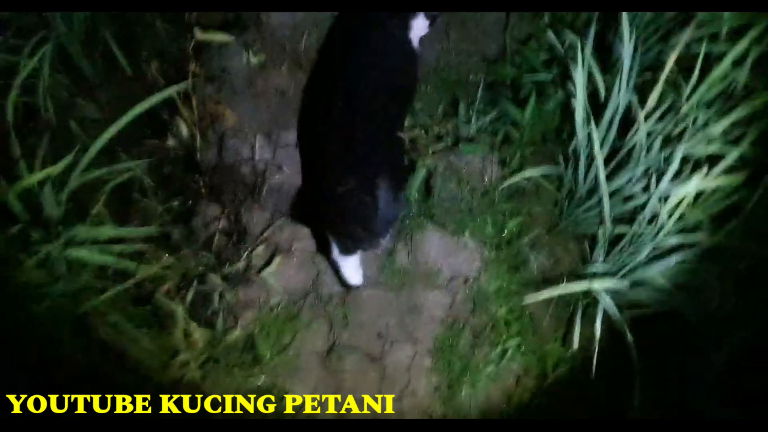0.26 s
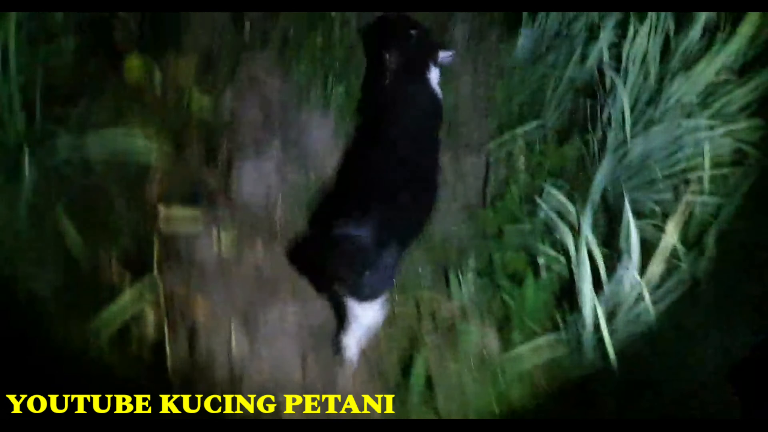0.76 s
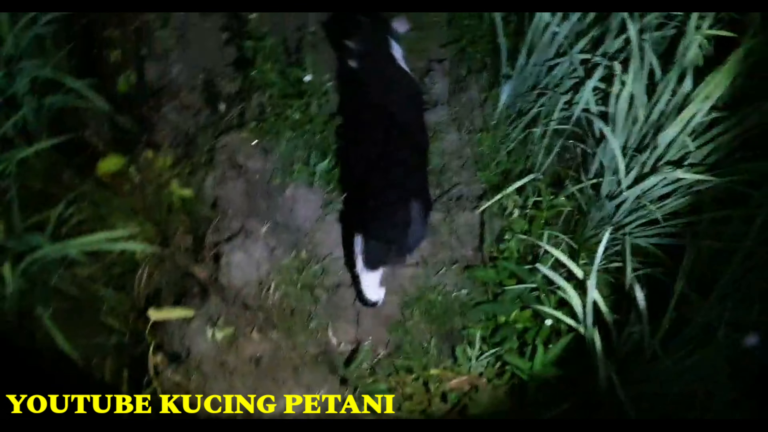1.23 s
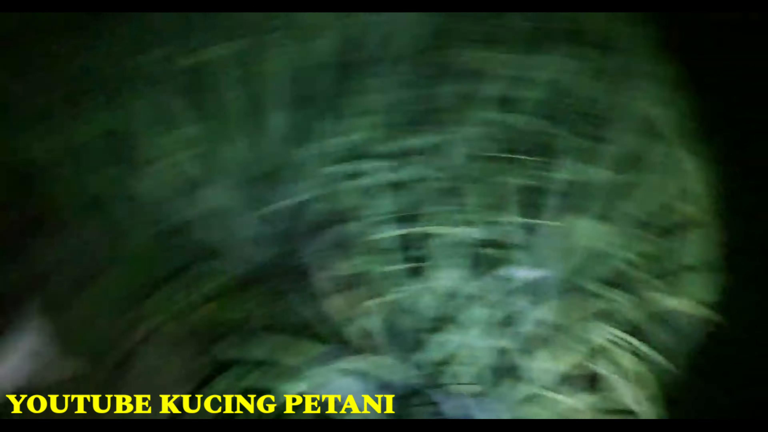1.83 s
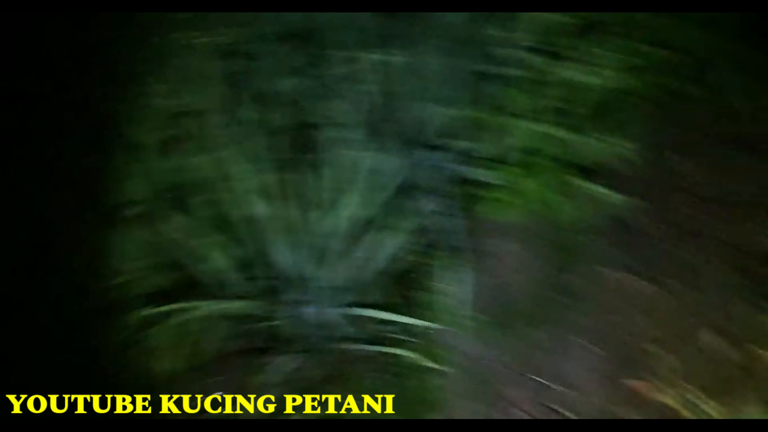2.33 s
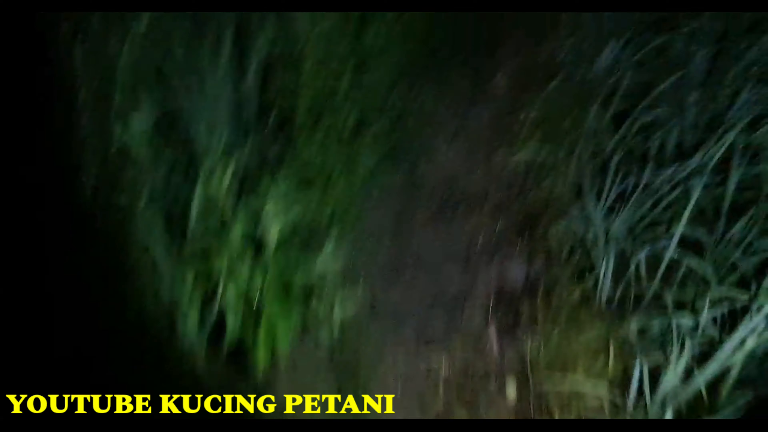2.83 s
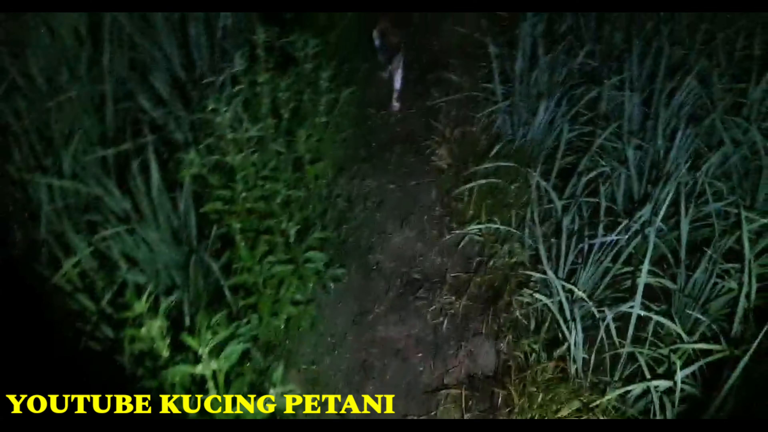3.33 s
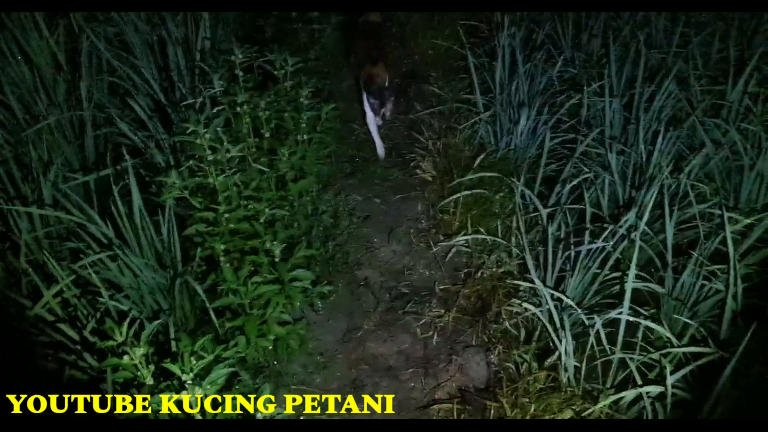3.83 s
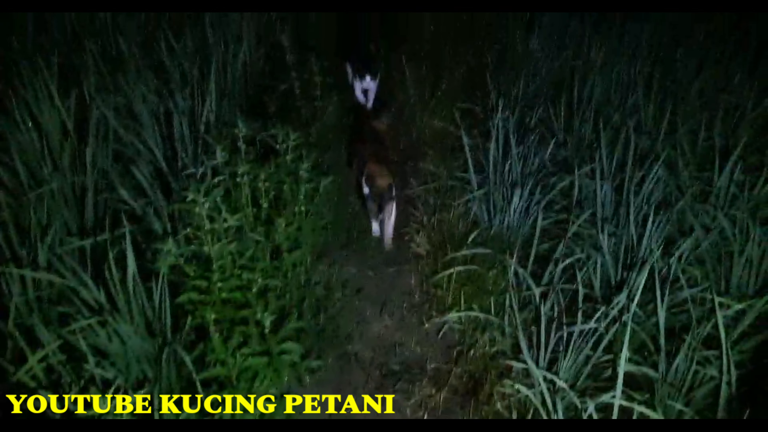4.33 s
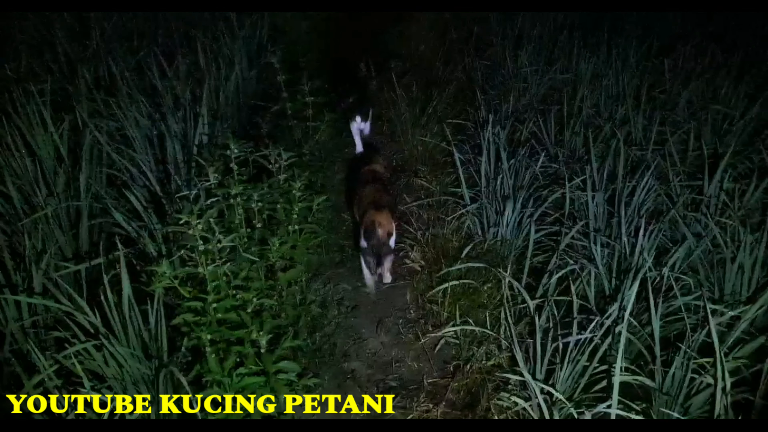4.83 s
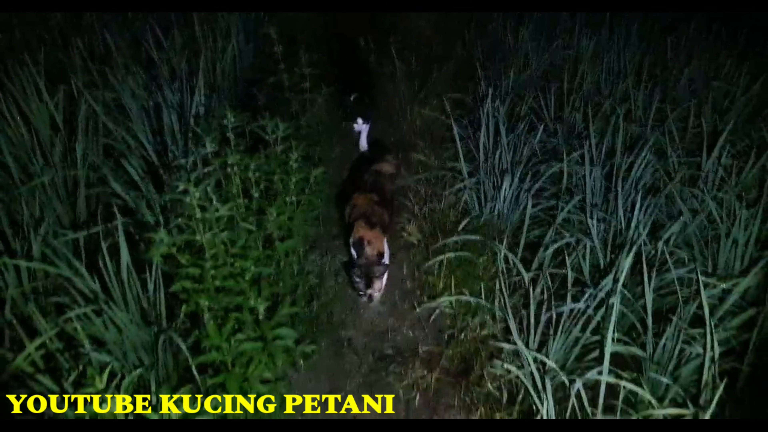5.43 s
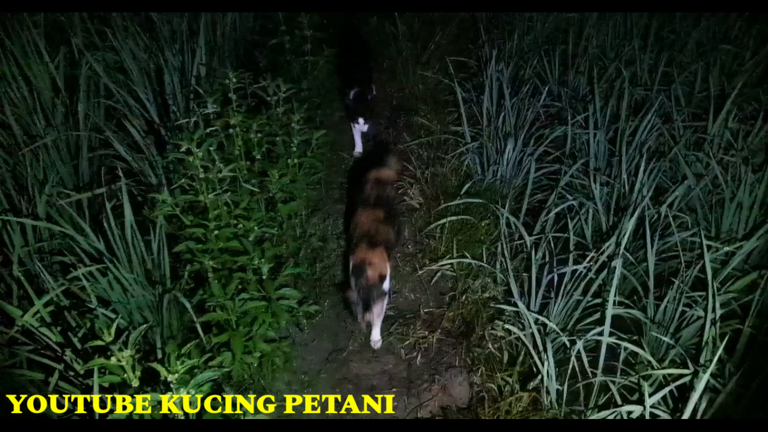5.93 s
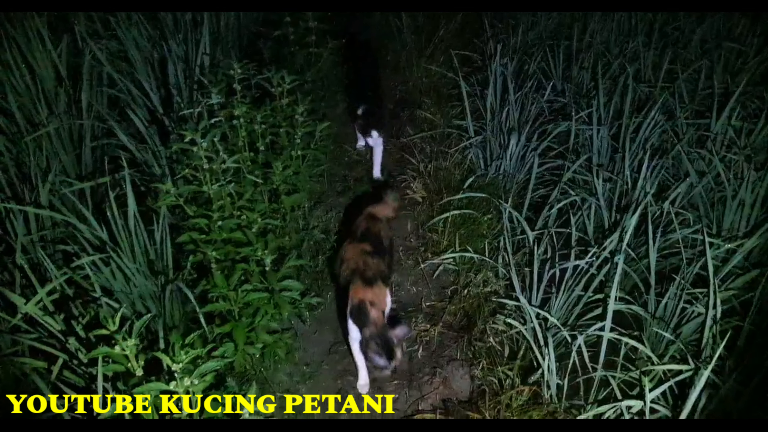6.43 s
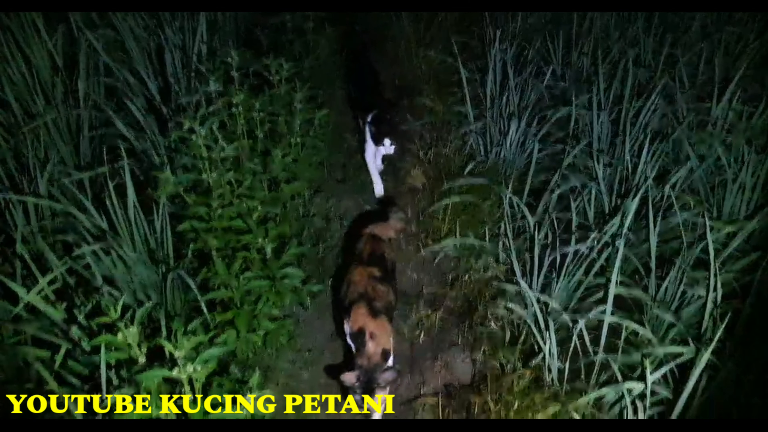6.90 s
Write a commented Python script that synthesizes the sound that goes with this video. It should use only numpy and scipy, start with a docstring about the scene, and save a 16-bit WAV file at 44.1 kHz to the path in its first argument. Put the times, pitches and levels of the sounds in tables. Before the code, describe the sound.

A rice field at night. A close frog is already rattling, stops after about a second, and a blurred distant one answers. The nearest, loudest frog then trills for nearly two seconds, a softer, lower one follows, and the nearest returns over its end. A faint frog chorus and shrill insects run throughout. Handheld microphone, outdoors, dry, with barely audible bumps.

```python
"""A rice field at night, heard from a path through a hand-held camera.
Three close frogs rattle out bouts of about 12 notes a second that swell and stop dead; each note is
four pulses of the vocal sac, the last often faint. Each pulse is a clap that rings in the sac.
Behind them another frog answers, a distant chorus of smeared pulse trains churns, insects shrill
in filtered noise, something peeps once, and the camera adds a faint rumble and soft bumps."""
import sys
import numpy as np
from scipy import signal
from scipy.fft import rfft, irfft, next_fast_len
from scipy.io import wavfile
from scipy.ndimage import map_coordinates

SR = 44100
rng = np.random.default_rng(int(sys.argv[2]) if len(sys.argv) > 2 else 0)


def to_wav(s):
    """Save 16-bit WAV."""
    ch = np.atleast_2d(s).T  # columns
    pcm = np.round(np.clip(ch, -1, 1) * 32767)  # PCM
    wavfile.write(sys.argv[1], SR, pcm.astype(np.int16))


N = 315756

# Slow rides of the high layers. Each row: time in seconds, insects and thin high chorus in dB before trim.
HIGH_LAYERS = [(0, -41.5, -49.5), (1.5, -41, -52.5), (2.3, -45.5, -54), (2.6, -44.5, -57.5),
               (3.3, -46.5, -51.5), (5.1, -47.5, -58), (7.16, -48.5, -54.5)]


def amp(db):
    """Amplitude factor of a level in dB."""
    return 10 ** (np.asarray(db) / 20)


def unit(x):
    """x at rms 1."""
    return x / np.sqrt(np.mean(x ** 2) + 1e-20)


def along(points, hz):
    """(Hz, value) points read on a log frequency axis."""
    f, v = np.transpose(points)
    return np.interp(np.log(hz + 1), np.log(f + 1), v)


def colour(points, hz):
    """Gain of a (Hz, dB) spectrum that falls away above its last point."""
    return amp(along(points, hz)) / np.maximum(hz / points[-1][0], 1) ** 4


def curves(rows):
    """One value per sample for each column after the time."""
    s, *cols = np.transpose(rows)
    return [np.interp(np.arange(N) / SR, s, c) for c in cols]


def wobble(rate):
    """A smooth random curve, rate knots a second."""
    knots = rng.standard_normal(int(N * rate / SR) + 4)
    place = np.arange(0, len(knots) - 1, 1 / 10)
    smooth = map_coordinates(knots, [place])
    return np.interp(np.arange(N) * rate / SR, place, smooth)


def filtered(x, response):
    """x times a response of frequency."""
    m = next_fast_len(N + SR // 2)
    return irfft(rfft(x, m) * response(np.fft.rfftfreq(m, 1 / SR)), m)[:N]


def shaped(x, spectrum):
    """x coloured by the given spectrum, at rms 1."""
    return unit(filtered(x, lambda hz: colour(spectrum, hz)))


def add(track, s, sound):
    """Mix a sound into the track at time s."""
    i = round(s * SR)
    lo, hi = max(i, 0), min(i + len(sound), len(track))
    if hi > lo:
        track[lo:hi] += sound[lo - i:hi - i]


def close_frogs():
    """Three frogs beside the path, each with its own sac and pulse rate; the nearest calls twice."""
    # The beat of each bout, even between rows. Each row: note number, time in seconds.
    first_beat = [(0, .033), (3, .2754), (4, .3618), (7, .612), (9, .7724), (11, .9415), (13, 1.1126),
                  (14, 1.2096)]
    near_beat = [(0, 2.42), (3, 2.612), (4, 2.6715), (5, 2.747), (12, 3.2758), (13, 3.3573), (16, 3.5889),
                 (20, 3.9009), (22, 4.0623)]
    near_again_beat = [(0, 5.72), (1, 5.7692), (2, 5.8595), (7, 6.2303), (8, 6.3104), (11, 6.539),
                       (13, 6.7012), (14, 6.792), (15, 6.878), (16, 6.9563), (17, 7.0435), (18, 7.1229)]
    low_beat = [(0, 4.452), (2, 4.577), (7, 4.928), (10, 5.158), (12, 5.318), (13, 5.4112), (16, 5.664),
                (18, 5.8495), (21, 6.109), (23, 6.306)]
    # What each vocal sac radiates. Each row: frequency in Hz, relative level in dB.
    first_sac = [(300, -66), (900, -16.5), (1300, -19), (1650, -12.5), (1950, -4.5), (2190, 4.5),
                 (2350, -0.5), (2550, -15), (2950, -9.5), (3400, -43), (4200, -23), (4700, -35),
                 (5250, -18), (5700, -67)]
    near_sac = [(300, -56), (800, -21), (1050, -15), (1600, -17.5), (1850, -13.5), (2100, -1), (2250, 0.5),
                (2420, 5.5), (2680, -2), (2980, -1.5), (3280, -8.5), (3700, -30), (4500, -34.5),
                (5200, -29), (5800, -51)]
    low_sac = [(300, -39), (950, -29), (1200, -30), (1600, -28), (1880, -2), (2060, 2.5), (2300, -7.5),
               (2700, -19), (3400, -34), (4000, -36.5), (6000, -46)]

    notes = bout(first_beat, full_db=-14.5, soft_db=-26, swell_at=0.12, swell_s=0.15,
                 first_db=-2.0, last_db=-28)
    first = frog(notes, first_sac, full_db=-13.5, pulse_hz=101.93, third_db=-2.0, cord_hz=565,
                 cord_db=-13.0, sag=0.0079, blur=0.05, jitter=.00013)

    notes = bout(near_beat, full_db=-8.5, soft_db=-35.5, swell_at=0.22, swell_s=0.14,
                 first_db=-1.5, last_db=-16)
    notes += bout(near_again_beat, full_db=-9.5, soft_db=-26, swell_at=.005, swell_s=0.074,
                  first_db=-0.5, last_db=-26)
    near = frog(notes, near_sac, full_db=-9.5, pulse_hz=105.9, third_db=-2.0, cord_hz=615,
                cord_db=-15.0, sag=.016, blur=0.083, jitter=.00013)

    notes = bout(low_beat, full_db=-18.5, soft_db=-29.5, swell_at=.66, swell_s=0.16,
                 first_db=-.5, last_db=-6.5)
    low = frog(notes, low_sac, full_db=-17.0, pulse_hz=109.3, third_db=-2.0, cord_hz=633,
               cord_db=-11.0, sag=0.0017, blur=0.062, jitter=0.00044)

    first = scattered(amp(1.27) * first, wet_db=-14.5)
    near = scattered(amp(0.93) * near, wet_db=-13)
    return first + near + scattered(low, wet_db=-8.0)


def bout(beat, full_db, soft_db, swell_at, swell_s, first_db, last_db):
    """Notes (s, dB, first pulse dB, last pulse dB) that start soft, swell swell_at s in, hold and stop dead."""
    # a note whose gap grows by halt_s starts weakly and runs on into its fourth pulse
    halt_s, halt_first_db, halt_last_db = 0.0085, -3.5, -6.5
    linger = 0.18  # dB that the fourth pulse gains for each dB of softer calling
    note_spread_db, last_spread_db = 0.76, 1.5

    number, when = np.transpose(beat)
    s = np.interp(np.arange(round(number[-1]) + 1), number, when)
    db = soft_db + (full_db - soft_db) / (1 + np.exp((s[0] + swell_at - s) / swell_s))
    gap_growth = np.pad(np.diff(s, 2), (2, 0))
    halt = np.clip(gap_growth / halt_s, 0, 1)
    louder, longer = rng.standard_normal((len(s), 2)).T
    last = np.minimum(last_db + linger * (full_db - db) + last_spread_db * longer, 0)
    first = first_db + halt * (halt_first_db - first_db)
    last = last + halt * (halt_last_db - last)
    return list(zip(s, db + note_spread_db * louder, first, last))


def frog(notes, sac, full_db, pulse_hz, third_db, cord_hz, cord_db, sag, blur, jitter, slack_db=7):
    """Four pulses a note; below full effort the slack sac rings lower and broader, and the cords stand out."""
    out = np.zeros(N)
    for s, db, first_db, last_db in notes:
        chance = rng.standard_normal((4, 4))
        slack = np.clip(full_db - db, 0, slack_db)
        for k, rel_db in enumerate([first_db, 0, third_db, last_db]):
            late, louder, higher, sharper = chance[k]
            # the last pulse comes late as the air runs out
            when = s + k / pulse_hz + 0.0007 * (k > 2) + jitter * late
            stretch = 1 - sag * slack + .006 * (k - 1) + .013 * higher
            focus = np.clip(1 - blur * slack + 0.0087 * sharper, .55, 2)
            clap = rasped(ring(sac, stretch, focus), rasp_db=-12.5 + 1.62 * slack)
            # the cords stand out more in slack notes and weak pulses
            wave = pulse(clap, cord_hz * stretch ** .5, cord_db + 0.82 * slack - 0.56 * rel_db)
            add(out, when - .0004 - len(wave) / 2 / SR, amp(db + rel_db + .5 * louder) * wave)
    # so small a body radiates little bass
    return filtered(out, lambda hz: 1 / (1 + (345 / (hz + 1)) ** 6))


def ring(sac, stretch, focus, snap=0.85, size=1024):
    """Ring of a vocal sac around one clap, peak 1; stretch scales its pitch, focus its resonances."""
    gain = colour(sac, np.fft.rfftfreq(size, 1 / SR) / stretch)
    cepstrum = irfft(focus * np.log(gain + 1e-6))
    # snap 1 is an instant closure; below it the clap builds briefly
    cepstrum[1:size // 2] *= 1 + min(snap, 1)
    cepstrum[size // 2 + 1:] *= 1 - min(snap, 1)
    wave = np.fft.fftshift(irfft(np.exp(rfft(cepstrum))))
    return wave / np.abs(signal.hilbert(wave)).max()


def rasped(clap, rasp_db, spread=0.0025, size=512):
    """Slack cords chatter around the clap, so that no two pulses ring alike."""
    t = (np.arange(size) - size / 2) / SR
    chatter = rng.standard_normal(size) * np.exp(-(t / spread) ** 2 / 2)
    chatter /= np.linalg.norm(chatter)
    return clap + amp(rasp_db) * signal.fftconvolve(clap, chatter, "same")


def pulse(clap, cord_hz, cord_db, swell=0.0024, release=0.0016, lead=0.00042,
          graze_db=-21, graze_lead=0.002417):
    """The cords swing ever wider, graze each other once, then clap shut (times in s)."""
    t = (np.arange(len(clap)) - len(clap) / 2) / SR + lead
    swing = np.exp(np.minimum(t, 0) / swell - np.maximum(t, 0) / release)
    cords = np.sin(2 * np.pi * cord_hz * t) * swing
    graze = amp(graze_db + 2 * rng.standard_normal()) * np.roll(clap, -round(graze_lead * SR))
    return amp(cord_db) * cords + graze + clap


def scattered(x, wet_db, count=12):
    """Plants and water scatter the sound; count noise tails cross-fade as the camera moves."""
    # Decay of the scatter. Each row: frequency in Hz, time to fall 60 dB in seconds.
    decay = [(300, 0.22), (2300, 0.069), (8000, 0.054)]
    out, place = x.copy(), np.linspace(0, count - 1, N)
    for k in range(count):
        hz, t, z = signal.stft(rng.standard_normal(SR // 4), SR, nperseg=256)
        fade = amp(-60 * t / along(decay, hz)[:, None])
        tail = signal.istft(z * fade, SR, nperseg=256)[1]
        tail /= np.linalg.norm(tail)
        share = np.maximum(1 - np.abs(place - k), 0)
        i = np.flatnonzero(share)
        wet = signal.fftconvolve(x[i] * np.sqrt(share[i]), tail)
        add(out, i[0] / SR + 0.00197, amp(wet_db) * wet)
    return out


def far_frog():
    """The same kind of call, blurred on its way through the rice."""
    # The beat, even between rows. Each row: note number, time in seconds.
    far_beat = [(0, 1.285), (6, 1.757), (8, 1.885), (11, 2.1), (12, 2.19)]
    # What the vocal sac radiates. Each row: frequency in Hz, relative level in dB.
    far_sac = [(300, -40), (900, 6), (1500, -7), (2130, 19), (2700, -7), (3900, -10), (4400, -40),
               (6500, -6)]
    notes = bout(far_beat, full_db=-33.5, soft_db=-43.5, swell_at=0.14, swell_s=0.035,
                 first_db=2, last_db=-3)
    call = frog(notes, far_sac, full_db=-32.5, pulse_hz=108.15, third_db=2.0, cord_hz=544,
                cord_db=-3.0, sag=0.0083, blur=0.011, jitter=.0006)
    return scattered(call, wet_db=-10.5)


def chorus():
    """Distant frogs fill the bands of cords and sac; a smaller kind calls higher up."""
    # Slow rides of the chorus. Each row: time in seconds, croak and rattle bands in dB before trim.
    band_levels = [(0, -46.5, -49), (1.3, -46, -46), (2.0, -51, -46), (2.32, -47.5, -50), (2.6, -45, -43),
                   (4.2, -46.5, -44), (5.1, -44.5, -44.5), (6.1, -43, -38), (6.7, -50.5, -44),
                   (7.16, -48.5, -47)]
    # Spectra of the three bands. Each row: frequency in Hz, relative level in dB.
    croak_spectrum = [(150, -44.5), (300, -24), (400, -11.5), (530, 4.5), (690, 2), (850, -13),
                      (1200, -17.5), (2000, -7.5)]
    rattle_spectrum = [(600, -32.5), (1000, -9), (1450, -9.5), (1800, -2), (2150, 5.5), (2400, 2.5),
                       (2750, -8), (3700, -20), (5500, -16), (8000, -28)]
    thin_spectrum = [(2400, -34), (2900, -3), (3220, 5), (3450, -9), (3750, -11), (5000, -26.5),
                     (7000, -42)]

    croak_db, rattle_db = curves(band_levels)
    _, thin_db = curves(HIGH_LAYERS)
    callers = crowd(note_hz=12.3, pulse_hz=103.84, haze_db=-2)
    croak = amp(croak_db + 2.0) * shaped(callers, croak_spectrum)
    rattle = amp(rattle_db + 1.0) * shaped(callers, rattle_spectrum)
    small_callers = crowd(note_hz=14, pulse_hz=118.4, haze_db=-1.5, count=3)
    thin = amp(thin_db + 1.5) * shaped(small_callers, thin_spectrum)
    return croak + rattle + thin


def crowd(note_hz, pulse_hz, haze_db, count=5, smear=0.0035, size=1024):
    """Pulse trains of distant callers, each swelling in its own time, over the noise haze of countless others."""
    out = np.zeros(N)
    for _ in range(count):
        notes = rng.random() + np.cumsum(note_hz * (1 + .07 * wobble(2))) / SR
        pulses = np.cumsum(pulse_hz * (1 + .06 * wobble(25))) / SR
        clicks = np.diff(np.floor(pulses), prepend=0)
        sounding = notes % 1 < .38
        train = clicks * sounding * amp(1.84 * wobble(2.38))
        # many paths through the stalks smear each pulse
        paths = rng.standard_normal(size) * np.exp(-np.arange(size) / SR / smear)
        out += signal.oaconvolve(train, unit(paths))[:N]
    return unit(out) + amp(haze_db) * rng.standard_normal(N)


def insects():
    """Bush crickets shrill in wing strokes; the treble dulls as the camera turns from them."""
    # Spectrum of the massed song. Each row: frequency in Hz, relative level in dB.
    song_spectrum = [(3060, -55), (5200, -22.5), (5330, -19.5), (6240, -7.5), (6710, 1.5), (7620, 2.5),
                     (8280, 0), (8840, -4.5), (10000, -12.5), (11600, -14), (12200, -22), (12400, -25),
                     (16100, -55), (22000, -120)]
    # Wing resonances of single crickets. Each row: frequency in Hz, half width in Hz, level in dB
    # against the massed song, before the strokes and a random waver.
    wings = [(6550, 65, -14.5), (7370, 76, -12.5), (7840, 66, -14)]

    def strokes(hz):
        return np.sin(2 * np.pi * np.cumsum(hz * (1 + 0.026 * wobble(7.1))) / SR)

    level_db, _ = curves(HIGH_LAYERS)
    buzz = amp(1.13 * strokes(hz=38.9) + 0.75 * strokes(hz=123.4) + 0.36 * wobble(11))
    song = shaped(buzz * rng.standard_normal(N), song_spectrum)
    for wing_hz, width_hz, db in wings:
        tone = filtered(rng.standard_normal(N), lambda hz: 1 / (1 + ((hz - wing_hz) / width_hz) ** 2))
        waver = amp(4.2 * wobble(8.1))
        song += amp(db) * waver * buzz * unit(tone)
    # the top moves further than the rest whenever the level moves
    top = filtered(song, lambda hz: 1 / (1 + (8800 / (hz + 1)) ** 12))
    facing_db = level_db - level_db.mean()
    return amp(level_db - 2.0) * (song + (amp(0.85 * facing_db) - 1) * top)


def peep(hz=4500, db=-50):
    """One thin, faint peep from the grass: a sine with an unsteady phase."""
    start, length = 5.375, .06  # s
    t = np.arange(N) / SR
    swell = np.sin(np.pi * np.clip((t - start) / length, 0, 1))
    return amp(db) * swell * np.sin(2 * np.pi * hz * t + 1.0 * wobble(260))


def handling():
    """Low noise: a faint rumble that rises and falls with the walking, and soft bumps of the hand."""
    # Bumps of the hand on the camera. Each row: centre in seconds, level in dB, bell width in seconds.
    bump_rows = [(2.28, -54, 0.025), (2.40, -67, 0.023), (2.557, -50, 0.0098), (2.643, -55, 0.033)]
    t = np.arange(N) / SR
    bumps = sum(amp(db) * np.exp(-((t - s) / length) ** 2 / 2) for s, db, length in bump_rows)
    thud = shaped(rng.standard_normal(N), [(20, -17.0), (42, -2), (65, -5), (100, -26)])
    rumble = shaped(rng.standard_normal(N), [(20, -5), (60, -2.5), (150, -1.0), (300, -2.5)])
    walking_db = np.interp(t, [1.2, 1.7, 2.0, 2.7, 4.3, 6.0], [-70, -65, -75, -66.5, -76.5, -71.5])
    return bumps * thud + amp(walking_db + 3.1 * wobble(16)) * rumble


def scene():
    """The whole field on one channel."""
    return (close_frogs() + far_frog() + chorus() + insects() + peep() + handling())[None]


def record(dry):
    """The camera keeps nothing above its band limit."""
    top_hz = 12250
    return np.array([filtered(x, lambda hz: hz < top_hz) for x in dry])


dry = scene()
out = record(dry)
to_wav(out)
```